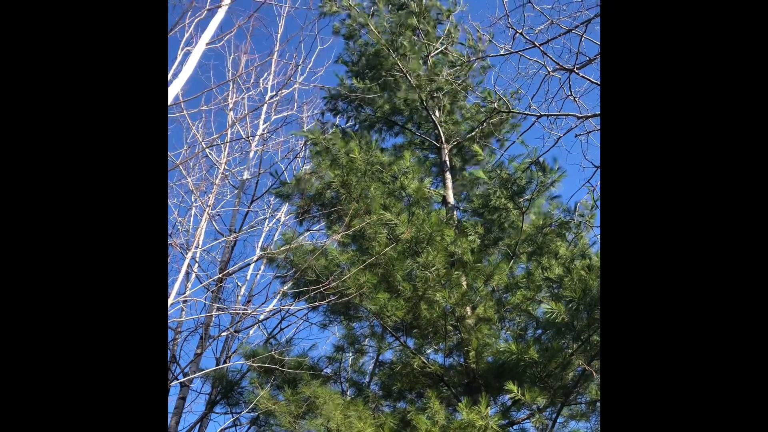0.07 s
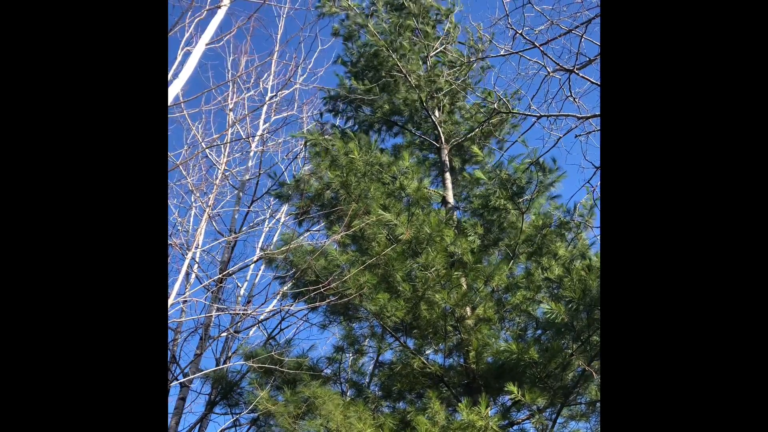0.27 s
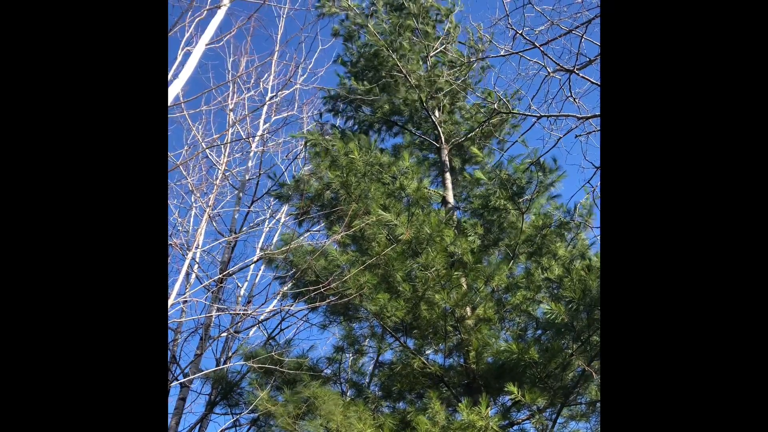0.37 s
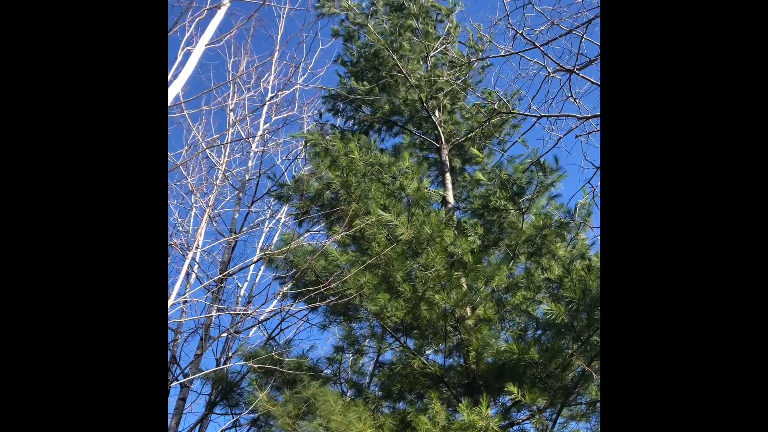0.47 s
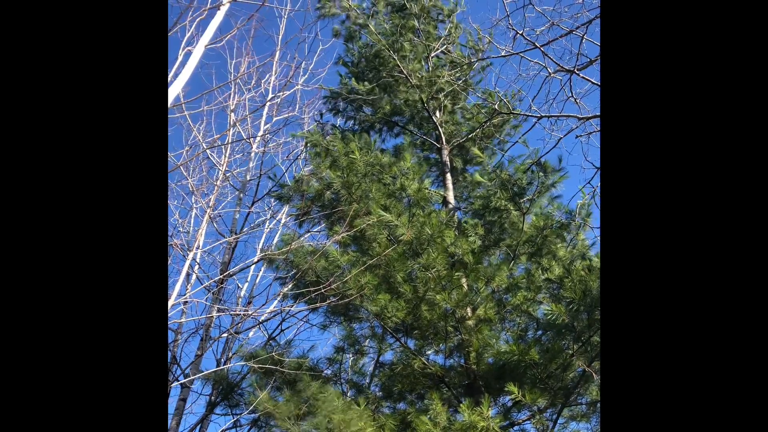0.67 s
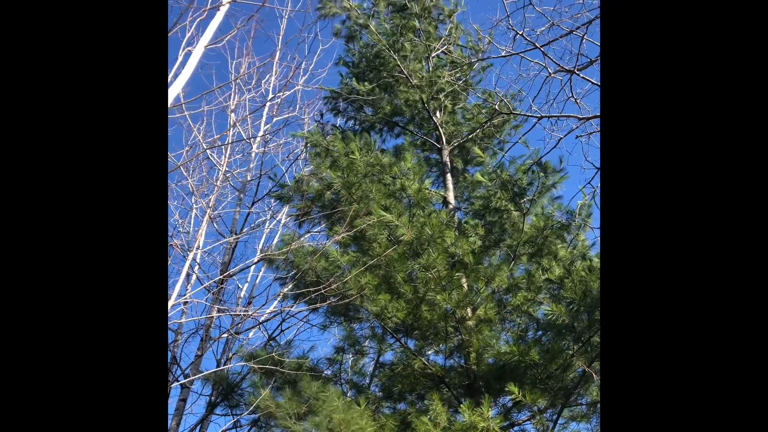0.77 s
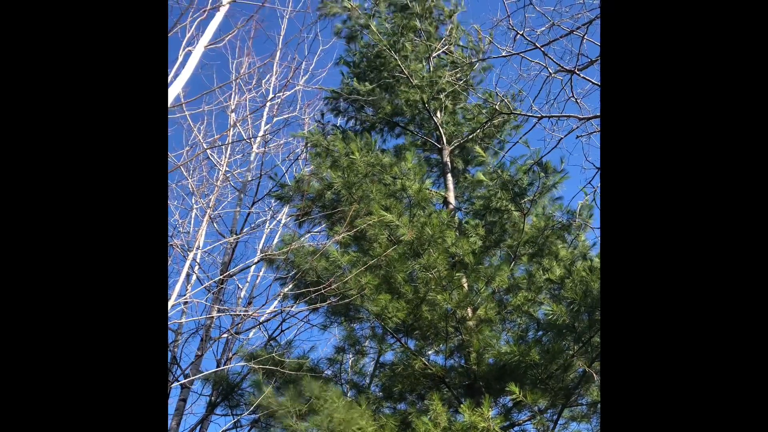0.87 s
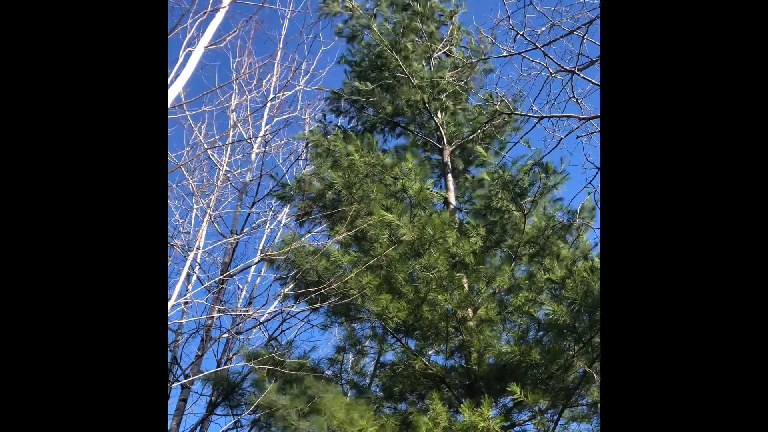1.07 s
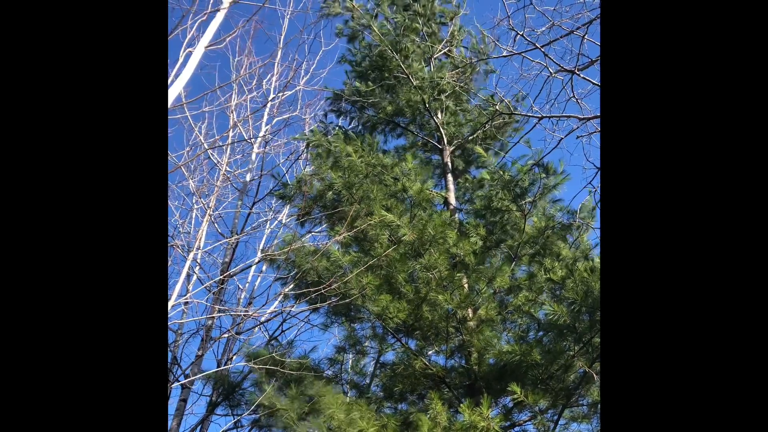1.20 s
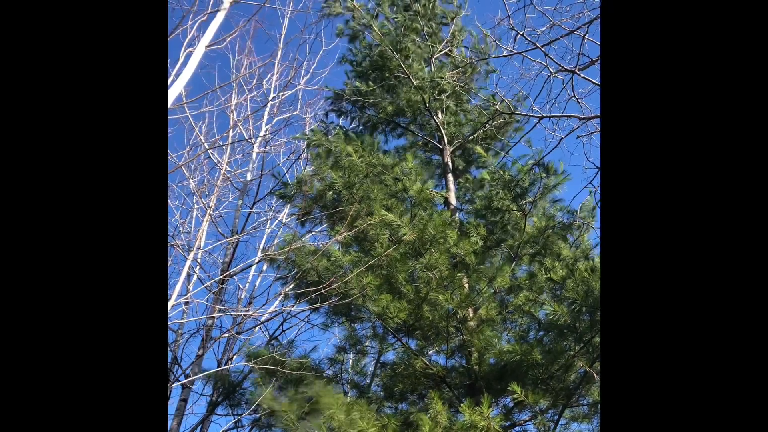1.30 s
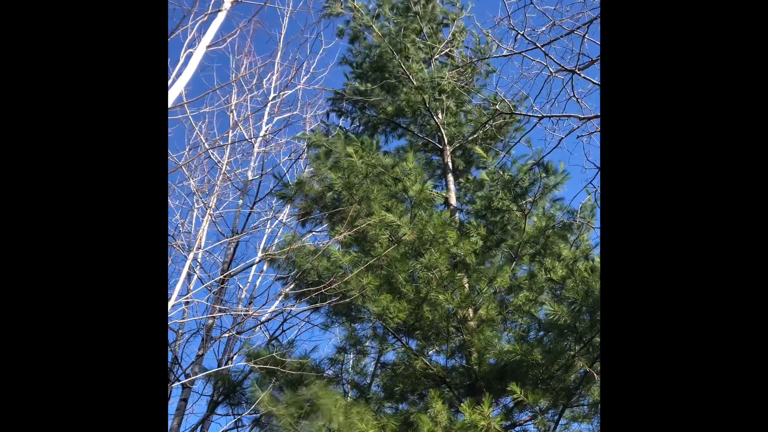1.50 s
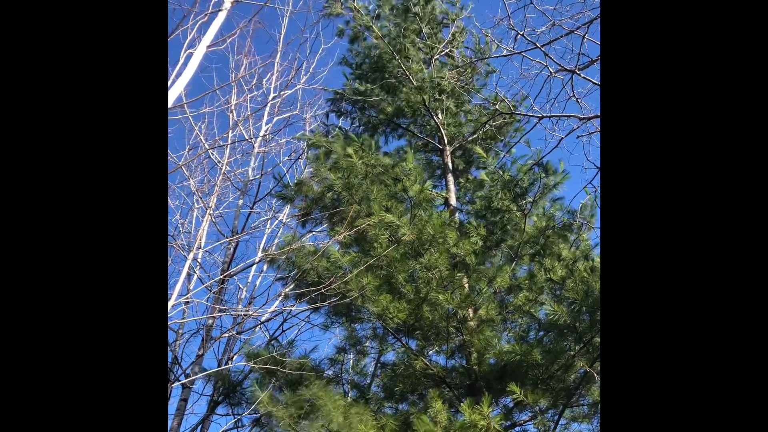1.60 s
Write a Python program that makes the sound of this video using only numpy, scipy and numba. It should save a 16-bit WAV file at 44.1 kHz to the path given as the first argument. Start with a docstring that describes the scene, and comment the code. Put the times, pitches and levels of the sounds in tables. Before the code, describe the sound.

Low, muffled wind gusts thump against an unprotected close microphone, peaking early in a rough flurry, then easing; behind them a very quiet smooth hiss of trees, a small twig snap and slight crisp rustles.

```python
"""Outdoors among pine trees in wind, heard on a bare phone microphone.
Far needles hiss smoothly: broadband noise in flickering bands. Gusts rumble on the microphone port:
low-passed noise whose corner rises as the air runs faster. Single eddies thump past as short swings of
falling pitch. Nearby dry twigs and cloth give faint ticks (decaying tones and band noise) and rustles
(puffs of treble)."""
import sys
import numpy as np
from scipy import signal
from scipy.io import wavfile
from scipy.ndimage import uniform_filter1d
from numba import njit

SR = 44100
rng = np.random.default_rng(int(sys.argv[2]) if len(sys.argv) > 2 else 0)


def bounce(signal):
    """Save signal as a 16-bit WAV file at the path given by the first command-line argument."""
    frames = np.transpose(np.atleast_2d(signal))
    limited = np.clip(frames, -1, 1)
    pcm = np.round(limited * 32767).astype(np.int16)
    wavfile.write(sys.argv[1], SR, pcm)


def boost(x):
    """Linear amplitude factor 10**(x/20) for a level x in decibels (scalar or array-like)."""
    u = np.asarray(x, float) / 20
    return 10 ** u


N = 72765


def in_time(rows):
    """Linear interpolation: columns of a table as curves over the samples."""
    s, *columns = np.transpose(rows)
    return [np.interp(np.arange(N) / SR, s, column) for column in columns]


def rms_one(x):
    """Normalisation to unit rms."""
    return x / np.sqrt(np.mean(x ** 2) + 1e-20)


def drift(rate_hz):
    """Slow random modulation of unit rms: white noise through two equal one-pole low-passes."""
    step = 20   # samples between drawn values
    pole = np.exp(-2 * np.pi * rate_hz * step / SR)
    white = rng.standard_normal(N // step + 2002)
    slow = signal.lfilter([1], [1, -2 * pole, pole * pole], white)[2000:]   # settled part
    return np.interp(np.arange(N) / step, np.arange(len(slow)), rms_one(slow))


def band(x, low_hz, high_hz, order=2):
    """Butterworth band-pass: maximally flat between its edges."""
    sos = signal.butter(order, [low_hz, min(high_hz, .45 * SR)], "band", fs=SR, output="sos")
    return signal.sosfilt(sos, x)


def needles():
    """Many far sources add up to smooth noise, shaped in half-octave bands that each flicker slightly."""
    # spectrum of the hiss before normalisation: hz, density_db (relative, per Hz)
    spectrum = [(30, -13.5), (70, 0), (160, -15), (320, -16.5), (740, -15), (1000, -18.5), (1400, -21.5),
                (2100, -27), (4000, -31.5), (6200, -34.5), (10000, -41.5), (15500, -45.5)]
    # swell of the trees: time_s, level_db (of the 1.5-4 kHz part)
    swell = [(0.0, -63.5), (0.546, -65.5), (0.96, -63.5), (1.65, -64)]
    whole_above_part_db = 12.5   # whole hiss above its 1.5-4 kHz part
    flicker_db = 0.26            # rms flicker of each band alone
    edges_hz = 28 * 2 ** np.arange(0, 9.6, .5)
    together = drift(3.0)
    white = rng.standard_normal((2, N))
    hz, density_db = np.transpose(spectrum)
    hiss = 0
    for k, (low, high) in enumerate(zip(edges_hz, edges_hz[1:])):
        band_db = np.interp(np.log(low * high) / 2, np.log(hz), density_db)
        band_db = band_db + flicker_db * (1.8 * together + drift(30))
        hiss = hiss + boost(band_db) * band(white[k % 2], low, high)   # neighbours use separate noise
    return boost(in_time(swell)[0] + whole_above_part_db) * rms_one(hiss)


def rustles():
    """Friction of dry things brushing together: band-passed grainy noise under Gaussian envelopes."""
    # puffs: start_s, level_db (rms before the envelope), centre_hz, width_octaves,
    # length_s (between the 1/e points of the envelope)
    puffs = [(0.226, -63, 7260, .8, .014), (0.243, -64, 8000, 1.2, 0.0073), (0.456, -66, 9000, 1.6, 0.028),
             (0.446, -67, 11500, .08, .022), (0.496, -73, 12000, .7, 0.038), (.63, -68.5, 9000, 1.5, .02),
             (0.636, -67.5, 10000, 2.2, .1), (0.711, -69, 9900, 1.7, 0.021),
             (0.727, -60.5, 5470, 0.79, 0.014), (0.794, -68, 12100, 1.0, .01), (.89, -67, 9050, 0.8, .008),
             (1.06, -66, 13600, .25, .01), (1.085, -67, 14100, 0.36, 0.0051),
             (1.254, -64.5, 12000, 1.0, .012), (1.281, -53.5, 13200, 0.31, 0.0035),
             (1.282, -58, 5340, 1.5, 0.0064), (1.296, -63, 13500, 0.39, .014),
             (1.302, -62, 7000, 1.6, .006), (1.357, -63, 6900, 2.4, .01), (1.386, -64.5, 13400, .35, 0.023),
             (1.376, -69.5, 9000, 2.4, 0.19), (1.428, -65, 9000, 1.7, 0.0054), (1.47, -71, 8680, 2.2, .015)]
    grain_db = 1.5   # rms unevenness of the noise
    out, t = np.zeros(N), np.arange(N) / SR
    grain = rng.standard_normal(N) * boost(grain_db * drift(300))
    for s, db, hz, octaves, length in puffs:
        near = slice(int((s - length) * SR), int((s + 2 * length) * SR))
        spread = 2 ** (octaves / 2)
        puff = rms_one(band(grain[near], hz / spread, hz * spread, order=4))
        envelope = np.exp(-((t[near] - s - length / 2) / length * 2) ** 2)
        out[near] += boost(db) * puff * envelope
    return out


def ticks():
    """Free decay of a snapped twig: a ringing tone with about equally strong band noise dying as fast."""
    # one row per ringing part: start_s, level_db (initial tone amplitude), pitch_hz, t60_s
    parts = [(.2273, -51, 6630, .012), (1.0148, -41, 820, 0.015), (1.0148, -41.5, 1470, 0.012),
             (1.0148, -49, 2150, 0.0081)]
    puff_db = -2   # noise rms relative to the tone's amplitude
    out = np.zeros(N)
    for s, db, hz, t60 in parts:
        t = np.arange(int(t60 * SR)) / SR
        white = rng.standard_normal(4000)[:len(t)]
        puff = rms_one(band(white, hz / 1.4, hz * 1.25, order=3))
        ring = np.sin(2 * np.pi * hz * t)
        start = int(s * SR)
        out[start:start + len(t)] += boost(db - 60 * t / t60) * (ring + boost(puff_db) * puff)
    return out


def eddies():
    """Vortex passage: each eddy is a couple of pressure swings that slow down as it leaves the port."""
    # single eddies: start_s, level_db (nominal peak), pitch_hz (nominal; the swing starts at 1.203 times it)
    thumps = [(0.208, -27.5, 206), (.3, -28.5, 350), (0.41, -28, 514), (.423, -16.5, 318),
              (0.415, -32, 515), (.427, -16.5, 187), (.435, -26, 470), (.445, -26.5, 457),
              (0.45, -14.5, 168), (0.495, -28, 160), (0.559, -27.5, 420), (0.563, -13.5, 186),
              (0.614, -7.5, 367), (.623, -15.5, 299.6), (.642, -16.5, 528), (0.652, -19, 306),
              (.663, -19.5, 639), (.672, -16, 425), (.686, -16, 665), (.704, -13, 395), (0.72, -14, 353),
              (.748, -26.5, 394), (.803, -29.5, 278), (0.892, -27, 147), (1.038, -33, 248),
              (1.186, -31, 370), (1.208, -26, 245), (1.225, -29.5, 375), (1.253, -34, 527),
              (1.259, -24, 417), (1.269, -37, 119), (1.298, -28.5, 424), (1.321, -46, 201),
              (1.545, -37, 200)]
    decay_cycles, rise_cycles = 0.76, 0.83   # the Gaussian decay falls to 1/e at twice decay_cycles
    mean_sag = 0.31      # pitch falls as 1 / (1 + sag * cycles)
    overtone_db = -19.5  # octave on the front of each eddy
    out = np.zeros(N + SR)
    for (s, db, hz), (turn, jitter) in zip(thumps, rng.random((len(thumps), 2))):
        cycles = np.arange(int(8 * SR / hz)) * hz / SR
        rise = 1 - np.exp(-(cycles / rise_cycles) ** 3)
        shape = rise * np.exp(-(cycles / decay_cycles / 2) ** 2)
        sag = mean_sag * (.5 + jitter)
        phase = 2 * np.pi * (1.203 * np.log1p(sag * cycles) / sag + turn)
        overtone = boost(overtone_db) * np.sin(2 * phase) * np.exp(-cycles / 1.9)
        start = int(s * SR)
        out[start:start + len(cycles)] += boost(db) * (np.sin(phase) + overtone) * shape / shape.max()
    return out[:N]


@njit
def moving_lowpass(x, g, count):
    """State-variable filtering: a cascade of two-pole low-passes whose corner moves (g in rad/sample)."""
    y = x.copy()
    for _ in range(count):
        low = mid = 0.0
        for i in range(len(y)):
            low += g[i] * mid
            mid += g[i] * (y[i] - low - 1.3 * mid)
            y[i] = low
    return y


def buffeting():
    """Turbulent pressure on the port: steep low-passed noise; small eddies show only in fast air."""
    # air on the port: time_s, level_db (before levelling and thinning),
    # corner_hz (before the fast unsteadiness)
    gusts = [(0, -39, 137), (0.04, -36, 138), (0.064, -33, 158), (0.12, -36, 168), (0.2, -32, 240),
             (0.3, -38, 258), (0.345, -28, 177), (0.39, -35, 245), (0.412, -38.5, 470), (0.43, -17.5, 224),
             (0.462, -40.5, 157), (0.482, -37, 157), (0.5, -22, 160), (0.535, -32, 173),
             (0.565, -30.5, 203), (0.583, -31.5, 200), (0.607, -27, 230), (0.615, -19, 446),
             (0.635, -21, 276), (0.665, -23, 485), (0.69, -23, 638), (0.725, -25, 373), (0.74, -37.5, 286),
             (0.77, -27, 220), (0.8, -39, 242), (0.84, -39.5, 168), (0.89, -30.5, 175), (0.935, -44.5, 148),
             (1.0, -57, 151), (1.025, -49, 148), (1.04, -34, 267), (1.065, -38.5, 96), (1.11, -84, 149),
             (1.165, -43, 155), (1.19, -26, 225), (1.23, -36, 227), (1.26, -26, 327), (1.28, -29.5, 134),
             (1.3, -38, 338), (1.335, -26, 187), (1.355, -49, 150), (1.37, -53, 150), (1.5, -57, 153),
             (1.55, -50, 202), (1.58, -66.5, 150), (1.65, -64, 144)]
    lump_spread_db, lump_rate_hz = 2.5, 67   # fast unsteadiness
    corner_oct_per_db = 0.0632   # faster air is louder and brighter
    skirt_db = -20               # shallower top added to the steep one
    # slow level swings of the noise are partly evened, so the gust curve sets the loudness
    level_window_s, level_share = 0.0318, 0.78
    big_eddy_share, big_eddy_cut = 0.46, 0.2   # eddies below this share of the corner are thinned
    level_db, corner_hz = in_time(gusts)
    lump_db = lump_spread_db * drift(lump_rate_hz)
    corner_hz = np.clip(corner_hz * 2 ** (corner_oct_per_db * lump_db), 40, 2000)
    g = 2 * np.pi * corner_hz / SR
    wide = moving_lowpass(rng.standard_normal(N), g, count=2)
    steep = moving_lowpass(wide, g, count=1)
    # a narrower band of white noise holds less power: make up for it
    air = (steep + boost(skirt_db) * wide) * np.sqrt(SR / 2 / corner_hz)
    local_power = uniform_filter1d(air ** 2, int(level_window_s * SR)) + 0.044
    air = boost(level_db + lump_db) * air / local_power ** (level_share / 2)
    return air - big_eddy_cut * moving_lowpass(air, big_eddy_share * g, count=1)


def scene():
    """Superposition: the pressures of all sources add at one microphone."""
    return (needles() + rustles() + ticks() + eddies() + buffeting())[None]


def top_cut(x):
    """Nothing passes above the cut-off."""
    return signal.sosfilt(signal.butter(12, 15680, fs=SR, output="sos"), x)


def record(dry):
    """High-pass response of the microphone: bass below the corner is cut."""
    bass_cut_hz = 55.3
    sos = signal.butter(4, bass_cut_hz, "high", fs=SR, output="sos")
    mix = signal.sosfilt(sos, dry)
    return top_cut(mix)


dry = scene()
out = record(dry)
bounce(out)
```